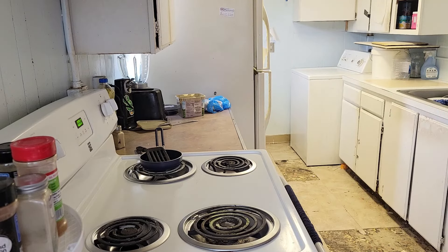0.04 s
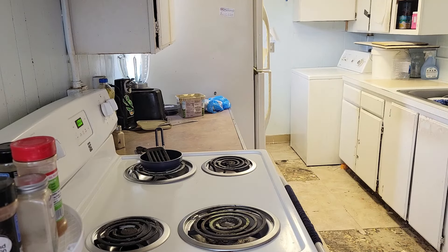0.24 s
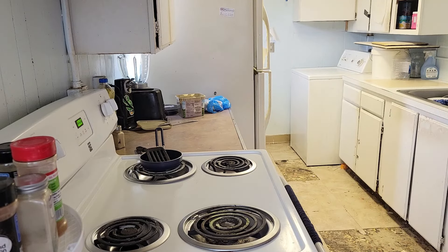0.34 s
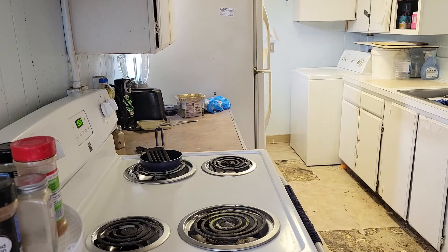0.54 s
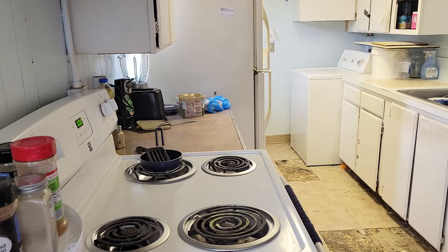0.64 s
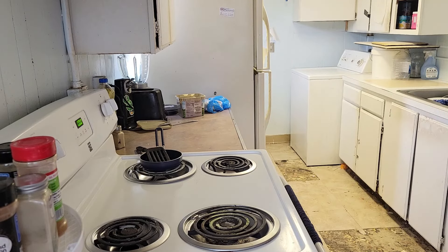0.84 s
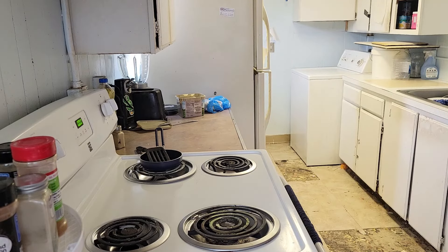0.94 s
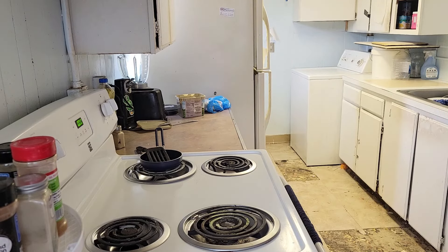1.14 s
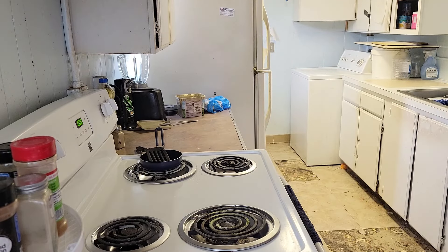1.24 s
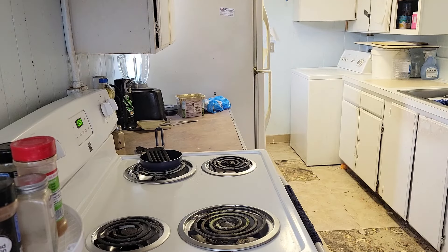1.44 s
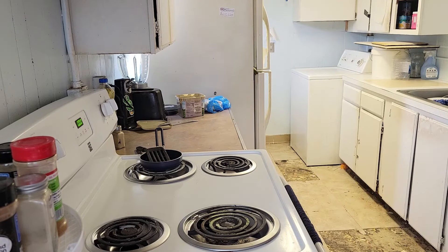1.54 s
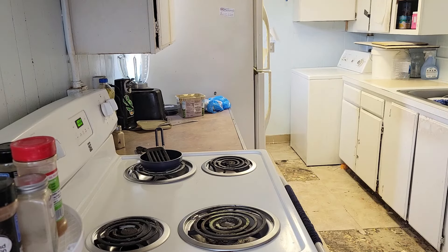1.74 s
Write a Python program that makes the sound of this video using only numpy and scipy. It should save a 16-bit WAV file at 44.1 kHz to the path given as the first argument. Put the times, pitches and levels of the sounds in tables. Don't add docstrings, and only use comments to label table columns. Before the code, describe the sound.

A microwave oven door rattles and clacks to a bright latch snap in a small kitchen

```python
import sys
import numpy as np
from scipy import signal
from scipy.fft import rfft, irfft, next_fast_len
from scipy.io import wavfile
from scipy.ndimage import map_coordinates

SR = 44100
rng = np.random.default_rng(int(sys.argv[2]) if len(sys.argv) > 2 else 0)


def rack_gain(trim_db):
    fader = np.asarray(trim_db, float)
    return 10 ** (fader / 20)


def materialize(psi):
    bounded = np.clip(np.atleast_2d(psi).T, -1, 1)
    quanta = np.round(bounded * 32767).astype(np.int16)
    wavfile.write(sys.argv[1], SR, quanta)


N = 79380

# [t/s, length/s, rattle level/dB, latch level/dB, boom level/dB]
CONTACT_BURSTS = [(0.187, 0.014, -42.5, -8.5, 10), (.204, 0.010, -40, -14, -7),
                  (0.216, 0.0084, -25, -37, -6), (0.233, 0.0098, -39, -11, -5),
                  (0.268, 0.0057, -38.5, -15, 9.5), (0.305, 0.006, -39.5, -14, -5),
                  (0.336, 0.011, -41, -4, -3), (0.346, 0.015, -31.5, -1, 5.5), (0.38, 0.017, -31, -7, -3),
                  (0.415, 0.0209, -19, -11.5, -0.5), (0.444, 0.018, -19, -8.5, -6.5),
                  (.472, 0.014, -14.5, -12.5, -4), (0.491, .016, -18, -12.5, -5.5),
                  (0.513, 0.0081, -28, -7, -1), (0.542, 0.0046, -25.5, -8.5, 7.5),
                  (0.564, 0.0245, -27, -16, -16), (0.597, .012, -36, 8.5, -8),
                  (0.603, 0.012, -19.5, -5, -18.5), (.628, 0.0163, -30.5, -38, 3.5),
                  (0.653, 0.014, -30.5, -8, -1.5), (0.699, 0.011, -39.5, -12.5, -1),
                  (0.74, 0.014, -46.5, -31, -13), (1.276, 0.024, -59.5, -36, 16.5)]
# [f/Hz, width/Hz, level/dB]
PANEL_MODES = [(568, 18, -11.5), (762.5, 38, 4), (1050, 26, 5.5), (1340, 58, 7), (1732, 33, -4.5),
               (1970, 110, -13), (2280, 13, -13), (2880, 22, -36), (3410, 300, -11), (3370, 120, -16),
               (4000, 630, -4), (5530, 60, -26)]
# [f/Hz, level/dB]
RATTLE_COLOUR = [(250, -4.5), (550, 1.5), (1000, -2.5), (2200, -3.5), (3800, -13.5), (4700, -20.5),
                 (5600, -32), (8000, -67)]
# [f/Hz, level/dB]
LATCH_COLOUR = [(3000, 5), (5500, 3), (8500, 0.5), (10000, -5), (12000, -7.5), (15000, -5.5)]
# [f/Hz, width/Hz, level/dB]
CABINET_MODES = [(116.5, 21.6, -1.5), (174.5, 12.4, 5), (227.6, 7.8, -2), (292, 21, -7.5), (333, 41, -2.5)]
# [f/Hz, width/Hz, level/dB]
HOOK_MODES = [(1164, 270, 8), (1900, 160, 12), (2756, 130, 7), (4000, 1500, -1.5), (5490, 260, 2.5),
              (7420, 400, -3), (8880, 190, -7), (11300, 860, -3)]
# [t/s, length/s, level/dB]
HOOK_SNAPS = [
    (0.337, 0.022, -32),
    (0.603, 0.02, -29),
    (0.6047, 0.011, -11.5),
]
# [t/s, level/dB, ring f/Hz, t60/s]
HARD_KNOCKS = [(.1993, -28, 800, 0.029), (0.2207, -34, 4220, .025), (.2237, -24.5, 2006, .06),
               (.2275, -24.5, 716, 0.037), (0.3525, -20, 1300, .05), (.4278, -20, 2140, 0.016),
               (0.4519, -10, 3170, 0.022), (.458, -9.5, 636, 0.026), (.476, -13, 1050, 0.032),
               (0.4769, -18, 4000, .04), (.4875, -10.5, 3510, 0.026), (.494, -14.5, 2930, 0.028),
               (0.499, -12, 1474, 0.025), (.509, -22, 3325, 0.055), (.539, -13.5, 1400, 0.0094),
               (0.6112, -18.5, 1083, .04), (.620, -15, 3710, 0.021), (.698, -40, 3713, 0.13),
               (.785, -47, 3700, 0.23), (0.214, -33, 53, 0.32), (.42, -36, 36.3, .4), (.57, -29, 34, 0.34),
               (1.5393, -36, 1510, 0.065), (1.566, -46, 1790, .08), (1.584, -36, 62, 0.21),
               (1.606, -60, 5940, .02), (1.6459, -38, 1300, .05), (1.6701, -37, 1790, 0.058),
               (1.690, -45, 2224, 0.14), (1.696, -50, 3480, .06), (1.724, -45, 1740, .05),
               (1.752, -44, 1835, .07), (0.2247, -30.5, 1047, 0.074), (.226, -29.5, 591.6, .15),
               (.512, -15, 170.6, .2), (0.4172, -25, 4560, 0.034), (.608, -20, 8760, 0.022),
               (.610, -21.5, 11130, 0.013), (.616, -20, 4820, 0.018), (1.290, -62, 3600, .06),
               (1.298, -57, 2300, 0.05), (.738, -46, 1970, .1), (1.665, -45, 60.4, 0.27),
               (.441, -17.5, 600, 0.068), (0.6058, -20, 3880, .03), (.36, -26, 996, 0.069),
               (1.282, -48, 855, .08), (.63, -25, 405, 0.12), (.79, -39, 70, 0.24)]
# [f/Hz, level/dB, t60/s]
SPRING_MODES = [(528, -41, .5), (3682, -42, .3), (5405, -48, .25)]
# [f/Hz, level/dB, t60/s]
TRAY_MODES = [(281.5, -33, 0.13), (867, -46.5, 0.099), (2300, -71, 0.078), (2790, -54, 0.059),
              (3530, -55, 0.074)]
# [t/s, length/s, level/dB]
FINGER_SLIPS = [
    (0.184, 0.094, -55),
    (0.341, 0.034, -41),
    (0.376, 0.058, -41),
    (0.485, 0.037, -37),
]
# [f/Hz, level/dB per Hz]
SKIN_COLOUR = [(9000, -21), (11500, 0), (13500, 5.5), (15700, -6.5)]
# [t/s, level/dB]
SLEEVE_STRENGTH = [(1.46, -70.5), (1.49, -64), (1.535, -57), (1.575, -54.5), (1.608, -55.5), (1.63, -60),
                   (1.68, -55), (1.755, -56.5), (1.785, -59.5)]
# [t/s, decay/s, level/dB]
CREASE_SNAPS = [(1.489, 0.018, -42.5), (1.539, 0.023, -41), (1.561, 0.041, -38.5), (1.605, 0.0082, -55),
                (1.63, 0.042, -40), (1.672, 0.043, -35.5), (1.699, 0.013, -42), (1.755, 0.012, -60)]
# [f/Hz, level/dB per Hz]
CLOTH_COLOUR = [(400, 0), (800, -3), (1800, -6.5), (3000, -15), (6000, -20.5), (10000, -24.5),
                (13000, -26.5), (15700, -24.5)]
# [f/Hz, level/dB per Hz]
FOLD_COLOUR = [(120, -10), (220, 25.5), (450, -3), (1000, -3), (1800, 2.5), (3500, -9), (5000, -21),
               (9000, -33)]
# [f/Hz, level/dB per Hz]
DRONE_COLOUR = [(15, -53), (25, -24), (70, -1), (146, -11.5), (198, -1.5), (248, -9), (284, -9.5),
                (414, -20), (500, -18), (650, -53), (1100, -120)]
# [f/Hz, level/dB per Hz]
AIR_COLOUR = [(260, -23.5), (450, -14), (512, -0.5), (744, -3.5), (877, 0), (956, -2), (2500, -20),
              (3250, -76), (5500, -120)]
# [f/Hz, level/dB per Hz]
HISS_COLOUR = [(1800, -44), (2500, -3.5), (4000, -5), (6500, -15.5), (8000, -13.5), (10000, -21),
               (12500, -13.5), (15700, -12)]
# [f/Hz, width/Hz, level/dB]
MOTOR_TONES = [(535, 14, 0.5), (800, 20, -3), (885, 20, -6), (121.4, 8, 10)]
# [f/Hz, t60/s]
KITCHEN_T60 = [(100, 0.17), (500, 0.33), (2000, 0.22), (6000, 0.13), (14000, 0.078)]
# [f/Hz, correlation]
ALIKE = [(60, 0.98), (130, 0.96), (290, 0.9), (640, 0.33), (1400, 0.1), (3000, -0.099), (15000, 0.16)]

GRAINS_PER_S, GRAIN_SPREAD_DB, RISE_SHARE = 4000, 3.8, 0.35
PANEL_DB, BOOM_FLOOR_HZ = 3, 92
KNOCK_ROOM_DB, TICK_DB, TICK_T60_S = -8, 0, 0.002
OVERTONE_RATIO, OVERTONE_DB = 1.47, -17.5
SPRING_S, TRAY_S, FLUTTER_DB = 0.603, 1.276, 6
CLOTH_DB, CLOTH_GRIT, GRIT_PER_S = 13.5, 0.5, 900
RUB_UNEVEN_DB, RUB_PATCH_DB = 0.8, 1.2
DRONE_DB, AIR_DB, HISS_DB, HUM_DB = -37, -50, -64, -51.5
EARLIER_DB, EARLIER_T60_S = -61, 0.34
ROOM_DB, ROOM_GAP_S, FAR_DB, FAR_T60_S = 3, 0.003, -32.5, 0.89
LEFT_LAG_S, LEFT_DIRECT_DB, LEFT_DB, PORT_LAG_S = 0.00042, -2, -1.05, 0.00013
CEILING, KNEE, TOP_HZ = 1.1, 8, 15750


def door():
    out, t = np.zeros((2, N)), np.arange(SR // 5) / SR
    rattle, latch = causal(RATTLE_COLOUR), causal(LATCH_COLOUR)

    def cabinet(hz):
        low_cut = (1j * hz / (BOOM_FLOOR_HZ + 1j * hz)) ** 3
        return resonances(CABINET_MODES)(hz) * low_cut

    for start, length, db, bright_db, boom_db in CONTACT_BURSTS:
        push, hits = burst(t, length)
        shaken = np.convolve(hits, rattle)[:len(t)]
        body = shaken + rack_gain(PANEL_DB) * filtered(shaken, resonances(PANEL_MODES))
        bright = np.convolve(hits, latch)[:len(t)]
        boom = filtered(push + 0.4 * hits, cabinet)
        boom *= np.linalg.norm(push) / np.linalg.norm(boom)
        blow = body + rack_gain(bright_db) * bright + rack_gain(boom_db) * boom
        add(out, kitchen(rack_gain(db) * blow), start)
    return out


def burst(t, length):
    when, size, sign = rng.random((3, len(t)))
    push = np.clip(t / (RISE_SHARE * length), 0, 1) * np.exp(-(t / length) ** 2)
    touching = when < GRAINS_PER_S / SR
    strength = rack_gain(-GRAIN_SPREAD_DB * np.log(size + 0.03))
    hits = push * touching * np.sign(sign - 0.5) * strength
    return push, hits * np.linalg.norm(push) / (np.linalg.norm(hits) + 1e-9)


def hook():
    out, t = np.zeros((2, N)), np.arange(SR // 5) / SR
    for start, length, db in HOOK_SNAPS:
        push, hits = burst(t, length)
        add(out, kitchen(rack_gain(db) * filtered(hits, resonances(HOOK_MODES))), start)
    return out


def knocks():
    out, t = np.zeros((2, N)), np.arange(SR // 3) / SR
    for start, db, hz, t60 in HARD_KNOCKS:
        ring = np.sin(2 * np.pi * hz * t)
        ring += rack_gain(OVERTONE_DB) * np.sin(2 * np.pi * OVERTONE_RATIO * hz * t)
        tick = rack_gain(TICK_DB - 60 * t / TICK_T60_S) * rng.standard_normal(len(t))
        tick = filtered(tick, resonances([(hz, 2 * hz, 0)]))
        add(out, kitchen(rack_gain(db) * (ring * rack_gain(-60 * t / t60) + tick), KNOCK_ROOM_DB), start)
    return out


def spring():
    return fluttering_ring(SPRING_MODES, SPRING_S)


def tray():
    return fluttering_ring(TRAY_MODES, TRAY_S)


def fluttering_ring(modes, start):
    out, t = np.zeros((2, N)), np.arange(SR // 2) / SR
    ring = np.zeros(len(t))
    for hz, db, t60 in modes:
        flutter = FLUTTER_DB * wobble(rate=94.0)[:len(t)]
        ring += rack_gain(db - 60 * t / t60 + flutter) * np.sin(2 * np.pi * hz * t)
    onset = 1 - np.exp(-(t / 0.0044) ** 2)
    add(out, kitchen(ring * onset), start)
    return out


def fingers():
    t, stroke = np.arange(N) / SR, np.zeros(N)
    for start, length, db in FINGER_SLIPS:
        onset = np.clip((t - start) / 0.006, 0, 1)
        stroke += rack_gain(db) * onset * np.exp(-((t - start) / length) ** 2)
    return stroke * rush([(6000, -78)] + SKIN_COLOUR, 2.2, 12, 4.1)


def sleeve():
    t, snaps = np.arange(N) / SR, np.zeros(N)
    for start, decay, db in CREASE_SNAPS:
        onset = np.clip((t - start) / 0.00087, 0, 1)
        snaps += rack_gain(db) * onset * np.exp(-np.abs(t - start) / decay)
    silence = [(SLEEVE_STRENGTH[0][0] - 0.05, -100)]
    when, level_db = np.transpose(silence + SLEEVE_STRENGTH)
    rub_db = np.interp(t, when, level_db) + CLOTH_DB + RUB_UNEVEN_DB * wobble(rate=50)
    rub = cloth(CLOTH_COLOUR)
    fold = cloth([(60, -40)] + FOLD_COLOUR + [(14000, -53)])
    return rack_gain(rub_db) * rub + snaps * fold


def cloth(colour):
    grit = (rng.random((2, N)) < GRIT_PER_S / SR) * rng.standard_normal((2, N))
    grit = pair(grit, lambda hz: rack_gain(along(colour, hz)))
    return rush(colour, RUB_PATCH_DB, 31, 3.5) + CLOTH_GRIT * grit


def appliances():
    lumps = rack_gain(2.2 * wobble(rate=70))
    drone = unit(lumps * rush(DRONE_COLOUR, 1.2, 4, 6))
    air = rush(AIR_COLOUR + [(4000, -66)], 0.36, 3.7, 5.2)
    earlier = rack_gain(EARLIER_DB - 60 * np.arange(N) / SR / EARLIER_T60_S)
    hiss = (rack_gain(HISS_DB) + earlier) * rush(HISS_COLOUR, 0.32, 23, 14)
    return rack_gain(DRONE_DB) * drone + rack_gain(AIR_DB) * air + hiss


def hum():
    noise = rng.standard_normal((2, N))
    return rack_gain(HUM_DB) * pair(noise, lambda hz: np.abs(resonances(MOTOR_TONES)(hz)) ** 2)


def kitchen(x, drier_db=0):
    hz, t, z = signal.stft(pair(rng.standard_normal((2, SR // 2))), SR, nperseg=256)
    near = rack_gain(-60 * t / along(KITCHEN_T60, hz)[:, None])
    far = rack_gain(FAR_DB - 60 * t / FAR_T60_S)
    tail = signal.istft(z * (near + far), SR, nperseg=256)[1]
    tail *= rack_gain(ROOM_DB + drier_db) / np.linalg.norm(tail[0])
    answer = np.pad(tail, ((0, 0), (round(ROOM_GAP_S * SR), 0)))
    answer[0, round(LEFT_LAG_S * SR)] += rack_gain(LEFT_DIRECT_DB)
    answer[1, 0] += 1
    balance = rack_gain([[LEFT_DB / 2], [-LEFT_DB / 2]])
    return signal.fftconvolve(x[None], answer, axes=1) * balance


def pair(x, gain=np.ones_like):
    def mid_side(hz):
        turn = np.arccos(np.clip(along(ALIKE, hz), -1, 1)) / 2
        return gain(hz) * np.array([np.cos(turn), np.sin(turn)])

    def lag(hz):
        return np.exp(-1j * np.pi * hz * PORT_LAG_S * np.array([[1], [-1]]))

    mid, side = filtered(x, mid_side)
    return unit(filtered(np.array([mid + side, mid - side]), lag))


def rush(spectrum, patchy_db, wide, long):
    z = signal.stft(rng.standard_normal((2, N)), nperseg=512)[2]
    patch = np.outer(np.hanning(wide), np.hanning(long))
    field = signal.fftconvolve(rng.standard_normal(z.shape[1:]), patch, "same")
    noise = signal.istft(z * rack_gain(patchy_db * unit(field)), nperseg=512)[1][:, :N]
    return pair(noise, lambda hz: rack_gain(along(spectrum, hz)))


def resonances(rows):
    def response(f):
        total = 0
        for k, (centre, width, db) in enumerate(rows):
            damping = 1j * f * width
            total = total + (-1) ** k * rack_gain(db) * damping / (centre ** 2 - f ** 2 + damping)
        return total
    return response


def causal(points, size=1024):
    ends = [(points[0][0] / 2, -60)] + points + [(points[-1][0] * 2, -60)]
    cepstrum = irfft(np.log(rack_gain(along(ends, np.fft.rfftfreq(size, 1 / SR)))))
    cepstrum[1:size // 2] *= 2
    cepstrum[size // 2 + 1:] = 0
    h = irfft(np.exp(rfft(cepstrum)))
    return h / np.linalg.norm(h)


def filtered(x, response):
    m = next_fast_len(x.shape[-1] + 8192)
    return irfft(rfft(x, m) * response(np.fft.rfftfreq(m, 1 / SR)), m)[..., :x.shape[-1]]


def along(points, hz):
    f, v = np.transpose(points)
    return np.interp(np.log(hz + 1), np.log(f + 1), v)


def wobble(rate):
    knots = rng.standard_normal(int(N * rate / SR) + 4)
    return map_coordinates(knots, [np.arange(N) * rate / SR])


def unit(x):
    return x / np.sqrt(np.mean(x ** 2) + 1e-20)


def add(track, x, start):
    part = track[:, round(start * SR):][:, :x.shape[1]]
    part += x[:, :part.shape[1]]


def scene():
    oven = door() + hook() + knocks() + spring() + tray()
    hand = fingers() + sleeve()
    return oven + hand + appliances() + hum()


def roll_off(x):
    return signal.sosfilt(signal.butter(12, 15730, fs=SR, output="sos"), x)


def record(dry):
    held = dry / (1 + np.abs(dry / CEILING) ** KNEE) ** (1 / KNEE)
    mix = filtered(held, lambda hz: hz < TOP_HZ)
    return roll_off(mix)


dry = scene()
out = record(dry)
materialize(out)
```